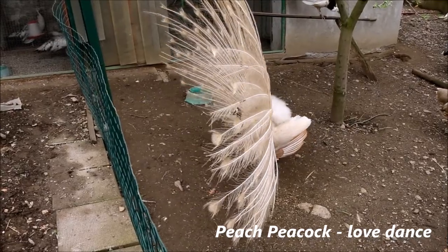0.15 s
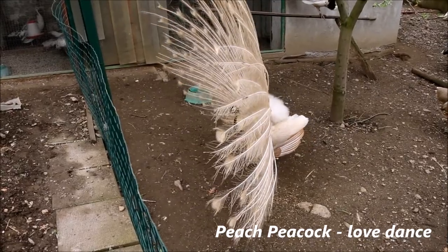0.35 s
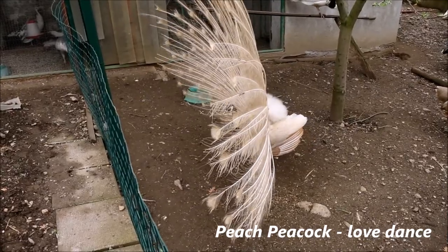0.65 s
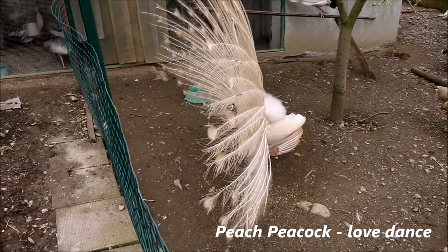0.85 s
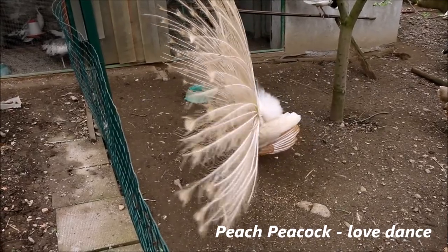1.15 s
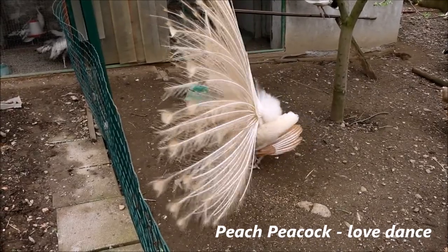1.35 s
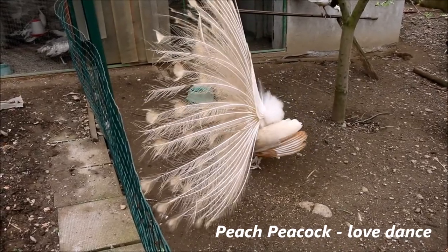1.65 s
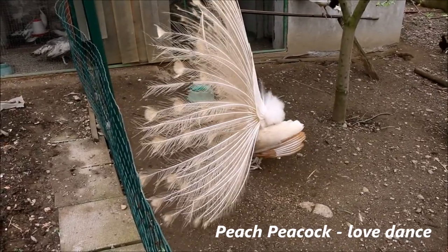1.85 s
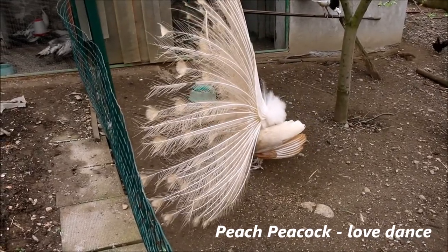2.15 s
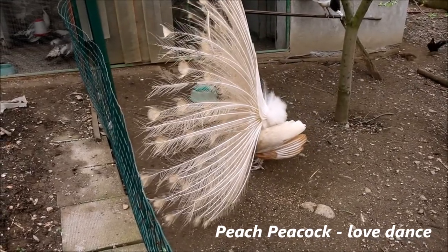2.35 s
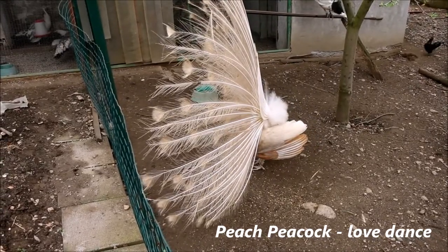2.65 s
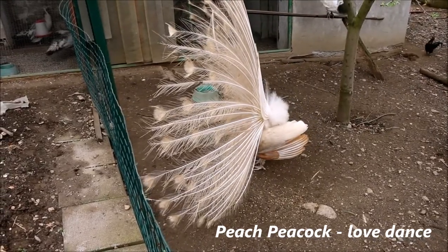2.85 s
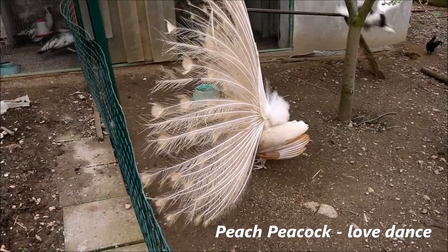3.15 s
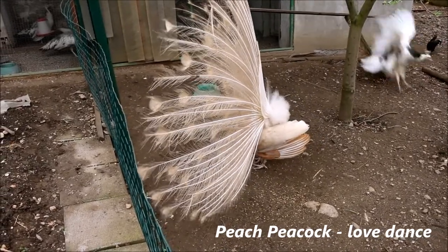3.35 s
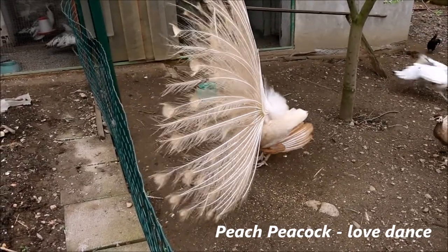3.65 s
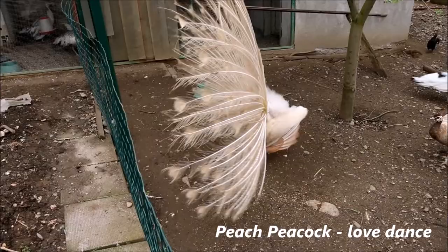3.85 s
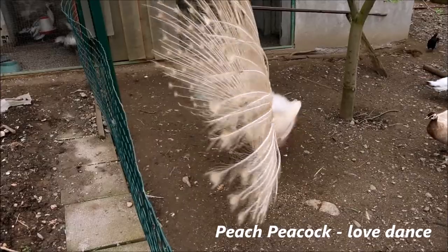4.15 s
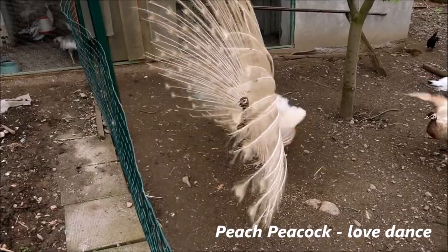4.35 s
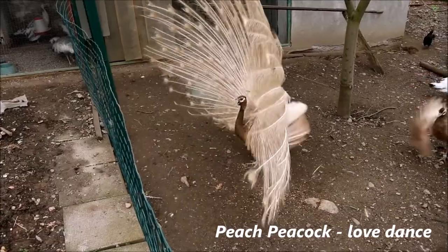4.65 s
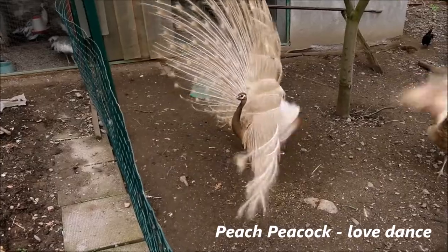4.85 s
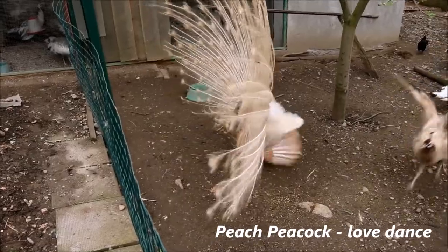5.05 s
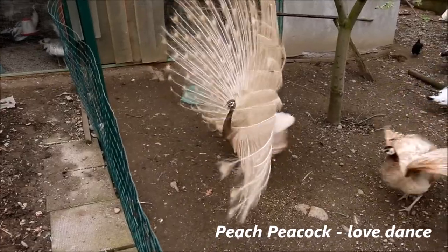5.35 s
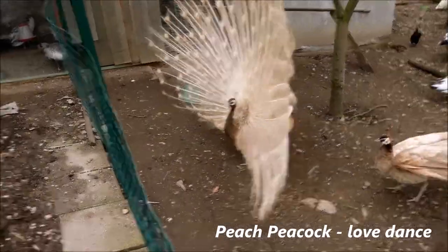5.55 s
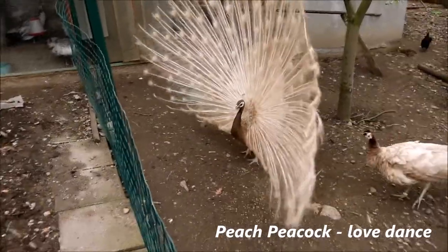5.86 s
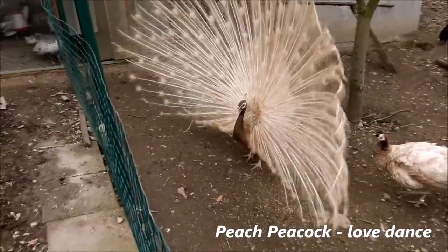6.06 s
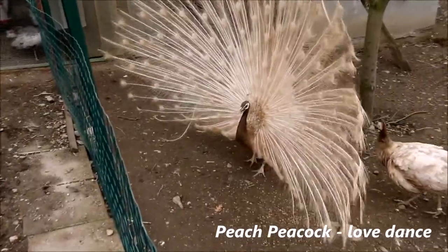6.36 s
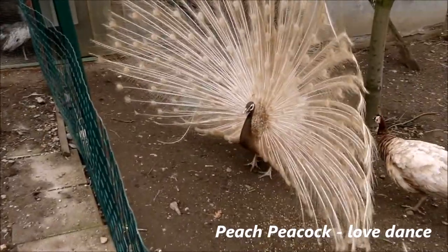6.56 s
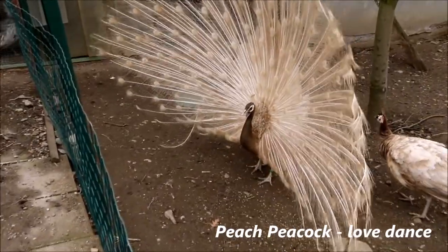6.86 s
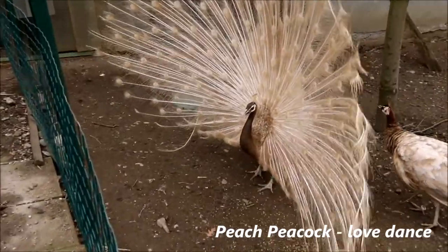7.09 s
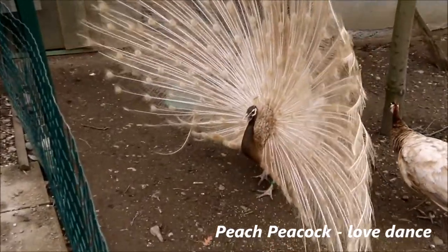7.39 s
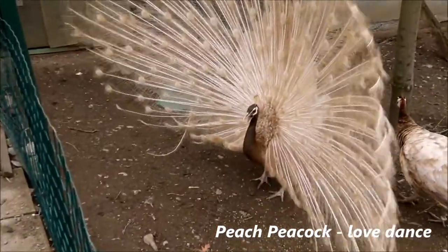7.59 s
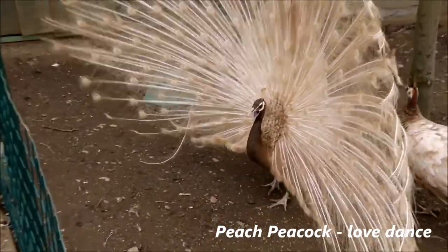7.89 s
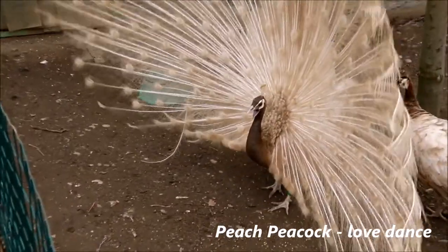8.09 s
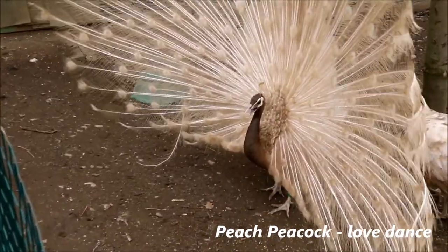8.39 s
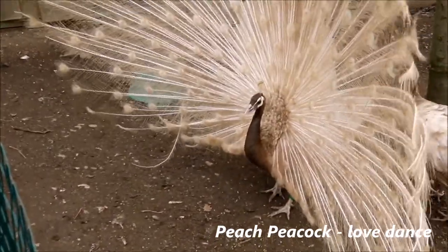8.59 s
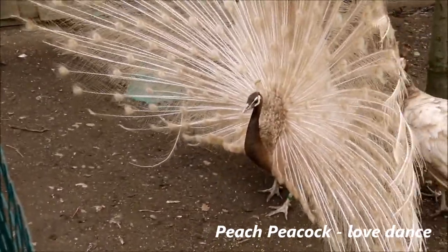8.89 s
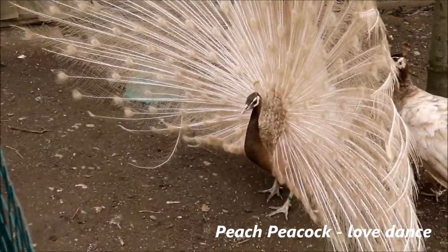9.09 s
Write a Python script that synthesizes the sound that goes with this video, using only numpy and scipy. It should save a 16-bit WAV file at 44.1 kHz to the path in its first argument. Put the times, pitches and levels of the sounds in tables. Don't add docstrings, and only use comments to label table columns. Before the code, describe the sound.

A murmuring yard with a distant rooster, chirps, clucks and wingbeats; a sharp wooden knock, then a peacock screams seven loud arched calls.

```python
import sys
import numpy as np
from scipy import signal
from scipy.fft import rfft, irfft
from scipy.io import wavfile
from scipy.ndimage import uniform_filter1d

SR = 44100
rng = np.random.default_rng(int(sys.argv[2]) if len(sys.argv) > 2 else 0)


def gain_from_db(level_db):
    decades = np.asarray(level_db, float) / 20
    return 10 ** decades


def wav_out(sig):
    wavfile.write(sys.argv[1], SR, np.round(np.clip(np.atleast_2d(sig).T, -1, 1) * 32767).astype(np.int16))


N = 407043

# (time [s], pitch [Hz], level [dB], beak opening [dB])
HOARSE = [
    [(3.55, 588, 5, -19), (3.568, 669, 4.5, -14.5), (3.612, 668.5, 5, -30.5), (3.65, 711, 3.5, -2),
     (3.72, 722.9, 6, -4), (3.81, 712.5, 0.5, -0.5), (4.03, 686, -3, 1.5), (4.12, 701.3, 5.5, -2.5),
     (4.18, 641, -6, 5.5)],
    [(4.399, 700, 15.5, -29.5), (4.414, 708, 6.5, -24), (4.475, 724, 5, -14.5), (4.535, 739.2, 3.5, -8),
     (4.635, 720.4, -3, 1.5), (4.735, 713.7, 3.5, -4), (4.785, 680, -1.5, -4), (4.818, 644, -10.5, 13)],
]
# (time [s], length [s], top pitch [Hz], climb time [s], sag begins after [s])
SCREAMS = [
    (5.186, 0.54, 703.5, 0.049, 0.32),
    (5.901, 0.48, 705.3, 0.039, 0.21),
    (6.566, 0.48, 704.9, 0.039, 0.2),
    (7.234, .46, 705.3, .036, .22),
    (7.897, 0.52, 713.5, 0.044, 0.24),
]
# (frequency [Hz], level [dB])
BEAK_COLOUR = [(3000, -66.5), (5200, -43.5), (6400, -40.5), (8200, -47), (10500, -51.5), (13000, -55.5),
               (16000, -55)]
HEN_VOICE = [(1, -2), (2, 3), (3, -2), (4, -2.5), (5, -14.5), (6, -29.5)]   # (overtone, level [dB])


def rms_one(x):
    return x / np.sqrt(np.mean(x ** 2) + 1e-20)


def filtered(order, hz, kind, x):
    return signal.sosfilt(signal.butter(order, hz, kind, fs=SR, output="sos"), x)


def at_hz(points, hz):
    points = np.array(points)
    return np.interp(np.log(hz), np.log(points[:, 0]), points[:, 1])


def drift(rate, size):
    knots = rng.standard_normal(int(size * rate * 2 / SR) + 4)
    wander = np.interp(np.arange(size) * rate * 2 / SR, np.arange(len(knots)), knots)
    return uniform_filter1d(wander, int(SR / rate / 4) + 1)


def span(rows):
    s, *columns = np.transpose(rows)
    t = np.arange(round(s[0] * SR), round(s[-1] * SR)) / SR
    return round(s[0] * SR), [np.interp(t, s, column) for column in columns]


def add(out, start, x):
    out[start:start + len(x)] += x[:N - start]


def fade(size, rise_s, fall_s):
    t = np.arange(size) / SR
    return np.clip(t / rise_s, 0, 1) * np.clip(t[::-1] / fall_s, 0, 1)


def swell(t, rise_s, t60_s, power):
    return np.clip(t / rise_s, 0, 1) ** power * gain_from_db(-60 * np.maximum(t - rise_s, 0) / t60_s)


def decay_noise_db(level_db, t60_s, t):
    return gain_from_db(level_db - 60 * t / t60_s) / np.sqrt(t60_s * SR / 14)


def hum():
    # (frequency [Hz], level [dB per Hz])
    hum_colour = [(60, -18), (207, -1.5), (437, -3.5), (592, -8), (989, -0.5), (1440, -9), (3180, -17.5),
                  (14500, -45.5)]
    # (frequency [Hz], likeness [-1 to 1])
    ear_likeness = [(60, 0.82), (180, 0.98), (550, 0.83), (1650, 0.51), (4970, -1.9), (15000, -0.73)]
    out = 0
    edges = 45 * 2 ** np.arange(0, 8.6, .5)
    white = rng.standard_normal((2, 2, N))
    for k, (low, high) in enumerate(zip(edges, edges[1:])):
        mid, side = filtered(2, [low, high], "band", white[k % 2])
        hz = np.sqrt(low * high)
        alike = np.clip(at_hz(ear_likeness, hz), 0, 1)
        gain = gain_from_db(at_hz(hum_colour, hz) + 2.5 * drift(7, N))
        out = out + gain * (np.sqrt(1 + alike) * mid + np.sqrt(1 - alike) * side * [[1], [-1]])
    return gain_from_db(-45) * rms_one(out)


def wind():
    # (time [s], level [dB], half length [s])
    gust_rows = [
        (.05, -52, 0.09),
        (2.65, -61, 0.04),
        (3.443, -53, 0.064),
        (4.42, -65.5, 0.088),
        (5.036, -60.5, 0.15),
        (5.892, -57, 0.086),
        (7.245, -67, 0.44),
        (8.579, -64, 0.53),
    ]
    t = np.arange(N) / SR
    shared, left, right = filtered(2, [18, 90], "band", rng.standard_normal((3, N)))
    rumble = rms_one(np.array([shared + 1.4 * left, shared + 1.9 * right]))
    rumble = rumble * gain_from_db(3 * drift(19, N)) * gain_from_db([[-2.1], [2.1]])
    shape = sum(gain_from_db(db) * np.exp(-2 * ((t - s) / half_s) ** 2) for s, db, half_s in gust_rows)
    return rumble * gain_from_db(-69.5), rumble * shape


def air():
    # (time [s], level [dB])
    hiss_level = [
        (0, -61.5),
        (3.4, -57),
        (4.3, -56.5),
        (5.8, -60),
        (6.5, -67.5),
        (9.23, -68),
    ]
    mid, side = filtered(1, [2500, 9000], "band", rng.standard_normal((2, N)))
    level_db = np.interp(np.arange(N) / SR, *np.transpose(hiss_level)) + 2 * drift(5, N)
    return gain_from_db(level_db) * rms_one(mid + 0.88 * side * [[1], [-1]])


def rooster():
    # (time [s], pitch [Hz], level [dB])
    crow = [(0, 911, -51), (.2, 900, -64), (.27, 831, -60), (.33, 1051, -51), (.41, 1068, -50),
            (.425, 1063, -49), (.445, 862, -58), (.46, 856, -50), (.5, 863, -56), (.53, 925, -56),
            (.8, 928, -53), (1.0, 901, -58.5), (1.3, 876, -53), (1.45, 837, -58), (1.6, 788, -55),
            (1.66, 760, -80)]
    # (overtone, level [dB], strongest at [s], loss away from it [dB per s])
    crow_voice = [
        (1, 5, .75, 12),
        (2, 8, .55, 14),
        (3, 4, 1.48, 28),
        (4, -1, 1.15, 32),
        (5, -13, 1.3, 15),
    ]
    out = np.zeros(N)
    start, (hz, level_db) = span(crow)
    size = len(hz)
    t = np.arange(size) / SR
    phase = np.cumsum(2 * np.pi * hz * (1 + .011 * drift(80, size)) / SR)
    tone = 0
    for k, db, at_s, loss_db in crow_voice:
        tone = tone + gain_from_db(db - loss_db * np.abs(t - at_s) + 3 * drift(12, size)) * np.sin(k * phase)
    add(out, start, gain_from_db(level_db) * tone * (1 + .55 * drift(80, size)))
    return out


def shaped(spectrum):
    hz = np.maximum(np.fft.rfftfreq(N, 1 / SR), 1)
    return rms_one(irfft(rfft(rng.standard_normal(N)) * gain_from_db(at_hz(spectrum, hz)), N))


def wings():
    # (time [s], rise [s], t60 [s], thump level [dB], hiss level [dB])
    puffs = [(0.303, 0.0061, 0.37, -64, -41.5), (.48, 0.0088, 0.28, -57, -46),
             (0.649, 0.014, 0.26, -58, -46.5), (2.47, 0.0083, 0.12, -55, -63), (1.28, 0.087, 1, -75, -50),
             (1.84, 0.015, 0.37, -68, -53.5), (2.019, 0.0057, 0.66, -57, -43),
             (2.13, 0.0084, 0.15, -69, -51), (2.217, .003, 0.52, -44, -96), (3.236, 0.0033, 0.22, -33, -52),
             (3.31, 0.037, 0.22, -42, -62), (3.386, 0.0014, 0.1, -29, -62),
             (3.405, 0.012, 0.27, -33.5, -43), (3.49, 0.061, 0.31, -46.5, -41.5),
             (4.388, 0.0037, 0.14, -38, -44), (4.981, 0.0023, 0.16, -39.5, -42),
             (4.99, 0.023, 0.19, -32, -36.5), (5.081, 0.025, 0.4, -104, -101),
             (5.929, 0.012, 0.16, -44.5, -62), (8.655, 0.0022, .08, -85, -70),
             (8.793, 0.0019, 0.13, -85.5, -74)]
    # (frequency [Hz], level [dB per Hz])
    thump_colour = [(40, -16.5), (196, -6), (350, -8), (520, -16.5), (997, -14.5), (3000, -32), (3900, -55),
                    (6600, -120)]
    # (frequency [Hz], level [dB per Hz])
    hiss_colour = [(300, -29.5), (1000, -11.5), (3000, -5.5), (6000, -13), (10000, -17.5), (16000, -21.5)]
    low, high = np.zeros(N), np.zeros(N)
    t = np.arange(SR // 2) / SR
    for s, rise_s, t60_s, thump_db, hiss_db in puffs:
        shape = swell(t, rise_s, t60_s, 2)
        add(low, round(s * SR), gain_from_db(thump_db) * shape)
        add(high, round(s * SR), gain_from_db(hiss_db) * shape)
    thumps = low * shaped(thump_colour) * gain_from_db(2.5 * drift(40, N))
    return thumps + high * shaped(hiss_colour) * gain_from_db(2.5 * drift(70, N))


def knock():
    # (time [s], peak level [dB])
    blows = [
        (3.2355, -24),
        (3.237, -21),
        (3.239, -11),
        (3.243, -19),
        (3.255, -21),
        (3.266, -29),
    ]
    # (frequency [Hz], level [dB], t60 [s])
    wood_modes = [(219, -16, 0.11), (450, -23, 0.13), (700, -11, 0.013), (1004, -15.5, 0.04),
                  (1197, -19, .025), (1385, -11, .02), (1530, -13, 0.036), (1640, -2, 0.016),
                  (1880, -22, 0.018), (2300, -17, 0.008), (3210, -23, 0.03), (4460, -25.5, 0.012)]
    at = [round(s * SR) for s, db in blows]
    out = np.zeros(N)
    for hz, level_db, t60_s in wood_modes:
        clicks = np.zeros(at[-1] + SR // 2) + 1e-18
        clicks[at] = gain_from_db(np.array(blows)[:, 1] + level_db + rng.normal(0, 2.5, len(at)))
        r, w = gain_from_db(-60 / (t60_s * SR)), 2 * np.pi * hz / SR
        add(out, 0, signal.lfilter([0, np.sin(w)], [1, -2 * r * np.cos(w), r * r], clicks))
    return filtered(2, 4500, "low", out)


def notes(rows, voice, over_db, bend, throb, rough):
    out = np.zeros(N)
    for s, length, start_hz, end_hz, level_db in rows:
        u = np.arange(int(length * SR)) / (length * SR)
        size = len(u)
        hz = end_hz + (start_hz - end_hz) * (1 - u) ** bend
        phase = np.cumsum(2 * np.pi * hz * (1 + rough * drift(90, size)) / SR)
        tone = sum(gain_from_db(db + over_db * (k > 1)) * np.sin(k * phase) for k, db in voice)
        shape = np.sin(np.pi * u ** 0.49) ** 0.44 * gain_from_db(throb * drift(45, size))
        add(out, round(s * SR), np.sqrt(2) * gain_from_db(level_db) * tone * shape * fade(size, 0.004, 0.0039))
    return out


def smeared(x):
    t = np.arange(SR // 4) / SR
    cloud = rng.standard_normal(len(t)) * decay_noise_db(-1, .16, t)
    return 1.22 * x + signal.oaconvolve(x, cloud)[:N]


def small_birds():
    # (time [s], length [s], start pitch [Hz], end pitch [Hz], level
    # [dB])
    chirps = [(.308, 0.018, 2900, 3300, -48), (.312, .02, 3600, 5300, -50), (.318, .028, 5300, 7200, -45),
              (.315, 0.024, 9000, 12300, -58), (.482, 0.035, 2750, 3250, -51),
              (.505, 0.03, 3200, 2940, -48), (.65, .03, 2900, 3300, -52), (.655, .03, 3600, 4500, -55),
              (.548, 0.037, 4590, 4950, -50), (.572, 0.03, 3300, 2950, -49), (.597, .04, 2900, 2500, -55),
              (.685, 0.048, 5600, 5750, -50), (4.972, .07, 2900, 4100, -52), (4.37, .02, 3200, 3700, -63),
              (1.65, 0.093, 2650, 3900, -50), (2.39, 0.024, 3700, 3950, -61),
              (2.456, 0.018, 2990, 3150, -49), (6.41, 0.036, 5600, 5850, -64),
              (8.685, 0.07, 5950, 5900, -69), (9.14, .09, 2430, 2410, -70), (8.3, 0.08, 1160, 1180, -61),
              (8.675, 0.04, 4800, 4880, -64), (8.842, 0.092, 2700, 4000, -62),
              (9.003, 0.11, 2450, 4100, -60), (5.81, 0.1, 3300, 4300, -69), (4.28, .03, 3200, 3600, -70)]
    # (time [s], length [s], start pitch [Hz], end pitch [Hz], level [dB])
    peeps = [
        (2.652, 0.036, 1332, 1364, -55),
        (2.81, 0.031, 1342, 1310, -52),
        (3.02, 0.045, 1353, 1310, -55.5),
        (3.183, 0.032, 1370, 1270, -56.5),
    ]
    # (overtone, level [dB])
    peep_voice = [(1, -20), (2, -23), (3, 5), (4, 0), (6, -18), (7, -6), (8, -9.5)]
    birds = notes(chirps, [(1, 2.5), (2, -11), (3, 0)], over_db=-17, bend=2.8, throb=5.5, rough=.016)
    birds += notes(peeps, peep_voice, over_db=-1, bend=1.5, throb=4, rough=.018)
    return smeared(birds)


def hens():
    # (time [s], length [s], start pitch [Hz], end pitch [Hz], level [dB])
    coos = [(.81, 0.073, 938, 662, -50), (2.215, 0.09, 993, 1008, -39), (2.29, 0.11, 1094, 1105, -45.5),
            (2.25, .1, 760, 750, -48), (2.23, .06, 1560, 1500, -50), (2.23, .06, 1950, 1850, -53),
            (2.24, .05, 2350, 2250, -56), (2.76, 0.18, 342, 291, -47), (3.05, 0.15, 715, 755, -47),
            (5.52, 0.21, 234, 228, -58), (2.43, 0.054, 1137, 1100, -50)]
    # (time [s], length [s], start pitch [Hz], end pitch [Hz], level [dB])
    clucks = [
        (.5, 0.051, 260, 670, -50),
        (1.81, 0.207, 465, 469.3, -46),
        (2.24, 0.146, 373, 363, -48),
    ]
    out = notes(coos, HEN_VOICE, over_db=-30, bend=1.5, throb=4.5, rough=.03)
    return out + notes(clucks, HEN_VOICE, over_db=-6, bend=1.5, throb=4.5, rough=.035)


def catches():
    # (time [s], length [s], start pitch [Hz], end pitch [Hz], level [dB])
    hoot = [
        (3.529, 0.048, 674, 627, -13.5),
    ]
    # (time [s], length [s], start pitch [Hz], end pitch [Hz], level [dB])
    squeaks = [
        (3.555, .06, 3850, 3840, -34),
        (3.553, .05, 5800, 6600, -34.5),
        (3.555, .035, 4400, 4540, -39),
        (3.56, 0.051, 2700, 3100, -39),
    ]
    out = notes(hoot, HEN_VOICE[:3], over_db=-27, bend=1.1, throb=1.5, rough=0.0028)
    return out + notes(squeaks, [(1, 0)], over_db=0, bend=2, throb=4, rough=.02)


def croaks():
    # (level [dB], time before the end [s])
    croak_rows = [
        (-44, 0.0093),
        (-39, 0.023),
        (-30, .015),
        (-38, 0.0085),
        (-36.5, .01),
        (-36, 0.02),
        (-39.5, .01),
    ]
    ends = [rows[-1][0] for rows in HOARSE] + [row[0] + row[1] for row in SCREAMS]
    out, t = np.zeros(N), np.arange(SR // 4) / SR
    rise_s, pulses_hz = 0.015, 109
    for end, (db, early_s) in zip(ends, croak_rows):
        beat = np.cumsum(2 * np.pi * pulses_hz * (1 + .3 * drift(30, len(t))) / SR)
        pulses = (1 + np.sin(beat)) ** 2
        rasp = rms_one(filtered(2, [2230, 2880], "band", pulses * rng.standard_normal(len(t))))
        add(out, round((end - early_s - rise_s) * SR), gain_from_db(db) * swell(t, rise_s, .17, 1) * rasp)
    return out


def hoarse(rows, third_db):
    # (frequency [Hz], level [dB])
    half_shut = [(500, -23.5), (750, -32.5), (1400, -13.5), (2100, -26), (2850, -28), (3500, -34),
                 (4300, -36), (7000, -57.5)]
    start, (hz, level_db, open_db) = span(rows)
    hz = uniform_filter1d(hz, int(0.013 * SR))

    def strength(k):
        beak_db = open_db * (k > 2) * (1 if k < 6 else 0.55)
        colour = gain_from_db(at_hz(half_shut, k * hz)) * (k < 11) + gain_from_db(at_hz(BEAK_COLOUR, k * hz))
        return gain_from_db(level_db + third_db * (k == 3) + beak_db) * colour
    return start, hz, strength


def clear(row, throat, swing, hollow, glide, shy_db):
    # (frequency [Hz], half width [Hz], level [dB])
    windpipe = [(566, 46.5, -24), (755, 42, -32.5), (1215, 218, -21), (1880, 120, -17.5),
                (2491, 127, -15.5), (2702, 48, -13), (3260, 104, -15.5), (3856, 135, -29.5),
                (4598, 220, -32), (5290, 110, -41), (5940, 130, -50.5)]
    gape_path = {3: -12.5, 5: -22, 6: -26, 7: -37, 8: -33.5, 9: -30.5, 10: -40, 11: -36}
    s, length, top_hz, climb_s, turn_s = row
    stretch, second_db, third_db, fourth_db, high_db = throat
    climb, sagging, opening, closing = swing
    first_hz, last_hz, depth_db, sets_s, early_flare_db = hollow
    third_lingers, fourth_drift, fifth_drift, sixth_drift = glide
    t = np.arange(int(length * SR)) / SR
    left = t[::-1]

    sag = np.clip((t - turn_s) / (length - turn_s), 0, 1) ** 1.52
    hz = top_hz - climb * 130.9 * np.exp(-t / climb_s) - sagging * 83.5 * sag - 64 * np.exp(-left / 0.019)
    level_db = -shy_db * np.exp(-(t / 0.055) ** 2)
    level_db = level_db - 9.5 * np.exp(-t / 0.0071) - 7 * sag - 7 * np.exp(-left / 0.061)
    dull_db = -0.5 * t / length + 13 * (np.exp(-t / 0.0096) + np.exp(-left / 0.0096))

    gape_width_hz = 23.4 * np.where(t < turn_s, opening, closing)
    gape = np.exp(-((top_hz - hz) / gape_width_hz) ** 2)
    linger = np.where(t < turn_s, gape, gape ** (1 / third_lingers ** 2))
    in_step = 1 - 2 * np.clip((t / turn_s - .5) * 2, 0, 1)

    hollow_hz = first_hz + (last_hz - first_hz) * t / length
    hollow_db = depth_db / (1 + np.exp((sets_s - t) / 0.022 * 2))
    flare_db = early_flare_db * np.exp(-((t - 0.072) / 0.05) ** 2)

    def strength(k):
        pipe = 0
        for at, width, db in windpipe:
            if abs(at - k * top_hz) < 1500:
                pipe = pipe + gain_from_db(db) / (1 + ((k * hz / stretch - at) / width) ** 2)
        pipe = pipe + gain_from_db(at_hz(BEAK_COLOUR, k * hz) + (2.5 + 0.17 * high_db) * gape)
        if k == 2:
            pipe = pipe * gain_from_db(second_db * (2 - gape))
        if k == 3:
            pipe = pipe * in_step
        if k == 4:
            pipe = pipe * gain_from_db((fourth_db + fourth_drift * (t - turn_s)) * gape)
        crest_db = gape_path.get(k, -99) + third_db * (k == 3) + high_db * (k > 6) + high_db / 4 * (k in (5, 6))
        crest_db = crest_db + (fifth_drift * (k == 5) + sixth_drift * (k == 6)) * (t - turn_s * .75)
        crest = (linger if k == 3 else gape) * gain_from_db(crest_db)
        sweep_db = flare_db * np.exp(-((k * hz - 6900) / 1700) ** 2)
        sweep_db = sweep_db - hollow_db * np.exp(-((k * hz - hollow_hz) / 1230) ** 2)
        return gain_from_db(level_db + sweep_db - dull_db * np.log2(max(k / 4, 1))) * (pipe - crest)
    return round(s * SR), hz, strength


def voiced(hz, strength, bright, manner, breath_db, rush):
    tilt_db, fifth_db, treble_db, patchy_db = bright
    jitter, first, held, last = manner
    size = len(hz)
    t = np.arange(size) / SR
    depth = held + first * np.exp(-(t / 0.071) ** 2) + last * (t / t[-1]) ** 4
    edge = np.exp(-t / .015) + np.exp(-t[::-1] / .025)
    beat = np.cumsum(2 * np.pi * 68.45 * (1 + .1 * drift(15, size)) / SR)
    phase = np.cumsum(2 * np.pi * hz / SR) + .33 * depth * np.cos(beat)
    slip = (jitter * (.5 + 2 * depth) + .3 * edge) * drift(150, size)

    voice = np.zeros(size)
    for k in range(1, 5):
        tone = strength(k) * np.sin(k * phase + k + (k - 1) ** 2.5 / 6 * slip)
        if k > 2:
            tone = tone * (1 + depth * np.sin(beat + 1.9 * k)) * gain_from_db(4 * held ** .5 * drift(20, size))
        voice += tone
    for k in range(5, 26):
        colour_db = tilt_db * np.maximum(np.log2(k * hz / 4000), 0) + (fifth_db if k == 5 else treble_db)
        patches_db = patchy_db * min(k / 9, 1.3) ** 2 * drift(13, size)
        mottle_db = 2.5 * min(k / 8, 1.5) * drift(40, size)
        gain = strength(k) * gain_from_db(colour_db + patches_db + mottle_db)
        gain *= 1 + np.sqrt(depth) * np.sin(beat + 1.9 * k)
        voice += gain * np.sin(k * phase + .7 * k * k + k ** 0.85 * slip)

    breath = np.convolve(rng.standard_normal(size), np.ones(40) / np.sqrt(40), "same")
    voice *= 1 + 0.63 * depth ** 3 * np.sin(beat) + (gain_from_db(-79.5) + 0.15 * edge) * breath
    puffing = (1 + .7 * np.sin(beat)) * (1 + np.sin(phase))
    voice += gain_from_db(breath_db) * (depth + 0.35 * edge) * puffing * rush
    return np.sqrt(2) * gain_from_db(-2) * voice * fade(size, .011, .012) ** 1.5


def peacock():
    hoarse_third_db = [3, -0.5]
    # (windpipe stretch [ratio], 2nd overtone [dB],
    # then at full gape: 3rd [dB], 4th [dB], higher [dB])
    throats = [(0.991, 2.5, -4, 0, 5.5), (0.997, 1.5, -1.1, 0, -2), (1.005, 1.96, -1, 0, 0.5),
               (1.008, 2, 0.5, 1, 0), (1.017, 2.15, -0.5, -3, -1.5)]
    swings = [(1.3, 1.3, 1.2, 0.68), (1.2, 1.13, 1.2, 0.86), (1.01, 1.01, 0.96, 0.79),
              (.9, 1.01, 0.67, 0.57), (1.01, 1.05, 1.13, 0.42)]
    # (first [Hz], last [Hz], depth [dB], sets in after [s], early flare [dB])
    hollows = [(9300, 8500, 16, 0.3, 7.5), (8600, 8500, 9.5, 0.063, 14.5), (8600, 6700, 9, 0.03, 13.5),
               (8800, 5600, 9, 0.045, 10.5), (8830, 5260, 10, 0.03, 3.5)]
    # (3rd overtone lingers [share], 4th, 5th, 6th drift [dB per s])
    glides = [(1.2, 14, -7.5, -4.5), (1, 3, -29.5, -30.5), (0.79, 13, -40, -30), (0.54, 20, -37, -2),
              (1.04, 37, -54, -38.5)]
    held_back_db = [1.5, 1.1, 1.9, 1.9, 3.2]
    # (treble tilt [dB per octave], 5th overtone [dB], higher [dB], patchiness [dB])
    brightness = [(1, -2, -4, 2.5), (-2.5, 0, 2, 2.5), (-0.5, -1, 1.5, 3), (-1, 2, 2.5, 2.5),
                  (-0.5, 2, 1.4, 2.5), (0.4, -2, -1, 2.5), (2.5, -4.5, -2, 2.5)]
    manners = [
        (.024, .45, .19, .45),
        (.028, .8, .2, .25),
        (.01, .3, .02, .15),
        (.007, .05, .02, .04),
        (.007, .04, .02, .04),
        (.007, .04, .02, .04),
        (.007, .04, .02, .03),
    ]
    breaths_db = [-46, -45, -45, -45, -45, -45, -51]
    out = np.zeros(N)
    screams = [hoarse(*each) for each in zip(HOARSE, hoarse_third_db)]
    screams += [clear(*each) for each in zip(SCREAMS, throats, swings, hollows, glides, held_back_db)]
    rush = filtered(2, [2600, 8500], "band", rng.standard_normal(N))
    for (start, hz, strength), bright, manner, breath_db in zip(screams, brightness, manners, breaths_db):
        add(out, start, voiced(hz, strength, bright, manner, breath_db, rush[start:start + len(hz)]))
    return filtered(4, 420, "high", out)


def yard(x, wet_db):
    # (time [s], level [dB])
    echoes = [
        (.0045, -18.5),
        (.0113, -18.5),
        (.019, -17.5),
        (.031, -19.5),
        (.047, -28),
        (.062, -26),
    ]
    t = np.arange(SR) / SR
    mid, side = rng.standard_normal((2, SR))
    side = filtered(2, 2800, "high", side)
    noise = mid + 2.8 * side * [[1], [-1]]
    near = noise * decay_noise_db(-14.5, .22, t) * (t > .006)
    far = filtered(1, [900, 4900], "band", noise) * decay_noise_db(-30, 0.83, t) * (t > .03)
    reply = near + far
    for ear_lag, (s, db) in zip(rng.integers(-5, 6, len(echoes)), echoes):
        reply[0, round(s * SR)] += gain_from_db(db)
        reply[1, round(s * SR) + ear_lag] += gain_from_db(db)
    return x + gain_from_db(wet_db) * signal.oaconvolve(x[None], reply, axes=1)[:, :N]


def ducking(loud):
    ducks_db = [12.3, 11.8, 16.4, 18.5, 21, 20.7, 26.6]
    grips_db = [8.5, 4.5, -2.5, -2.5, -4.5, -3, -7.5]
    # (share, speed [dB per s])
    recovery = [
        (0.449, 67.5),
        (0.551, 8.5),
    ]
    lag_s = .05
    lag, t = int(lag_s * SR), np.arange(N) / SR
    starts = [rows[0][0] for rows in HOARSE[1:]] + [row[0] for row in SCREAMS]
    which = np.searchsorted(starts, t)
    sounding = uniform_filter1d(loud ** 2, lag) > gain_from_db(2 * -30)
    push_db = np.array(ducks_db)[which] * sounding
    held = sum(np.maximum.accumulate(share * push_db + rate * t) - rate * t for share, rate in recovery)
    late = np.interp(t - lag_s, t, uniform_filter1d(held, lag))
    grip = np.array(grips_db, float)[which] * sounding * (late > 6)
    return gain_from_db(-late - uniform_filter1d(grip, lag))


def scene():
    near = peacock() + croaks() + catches()
    around = small_birds() + hens() + rooster() + wings() + knock()
    around = filtered(2, 70, "high", around)
    far = yard(around, wet_db=1.5) * gain_from_db([[-.7], [.7]])
    breeze, gusts = wind()
    steady = (hum() + breeze) * ducking(near)
    pan = gain_from_db(-3.5 / 2 * np.array([[1], [-1]]))
    treble_lean = gain_from_db(-16.5) * filtered(1, 8800, "high", near) * [[1], [-1]]
    return yard(near, wet_db=1.5) * pan + treble_lean + far + steady + gusts + air()


def top_cut(x):
    return signal.sosfilt(signal.butter(12, 16070, fs=SR, output="sos"), x)


def record(dry):
    level_db = 20 * np.log10(np.abs(dry).max(axis=0) + 1e-6)
    ramp = 60 * np.arange(N) / SR
    held = np.maximum.accumulate(level_db + ramp) - ramp
    cut_db = uniform_filter1d(.5 * np.maximum(held + 7, 0), int(.015 * SR))
    top = signal.cheby2(12, 70, 16500, fs=SR, output="sos")
    return top_cut(signal.sosfilt(top, dry * gain_from_db(-cut_db)))


dry = scene()
out = record(dry)
wav_out(out)
```